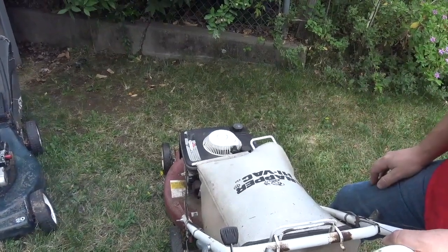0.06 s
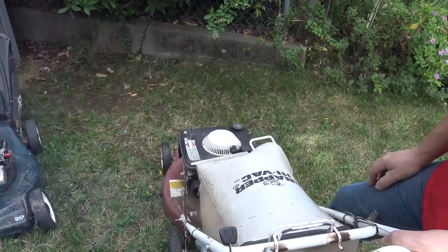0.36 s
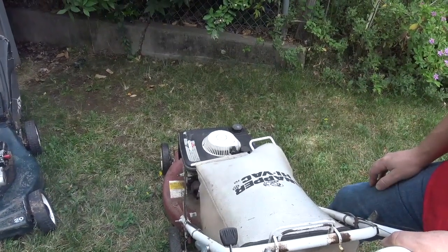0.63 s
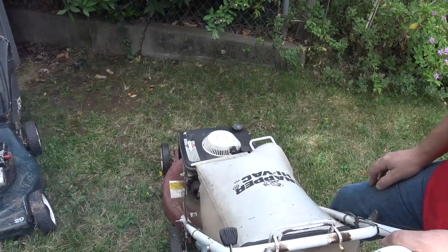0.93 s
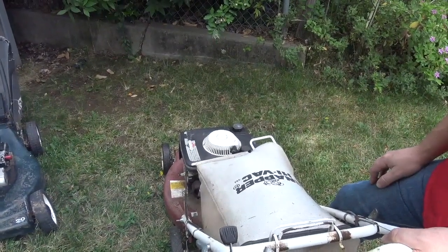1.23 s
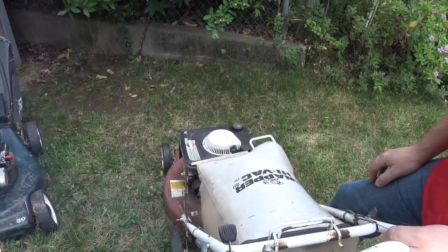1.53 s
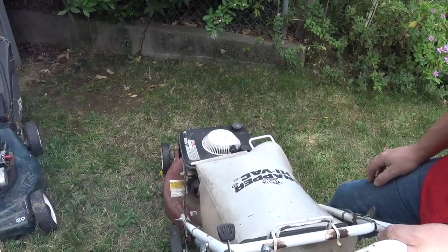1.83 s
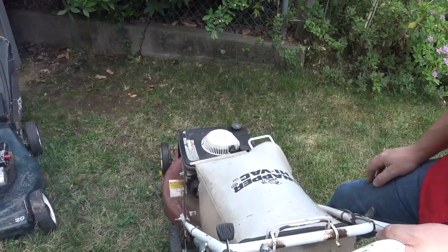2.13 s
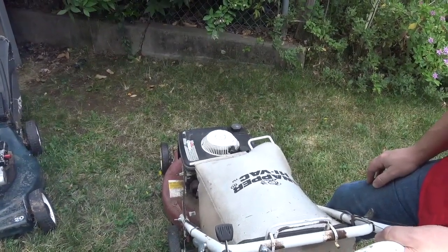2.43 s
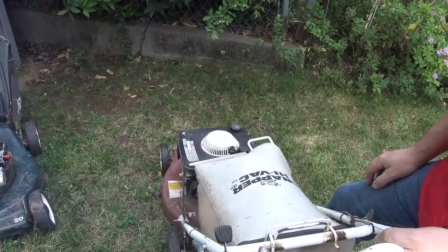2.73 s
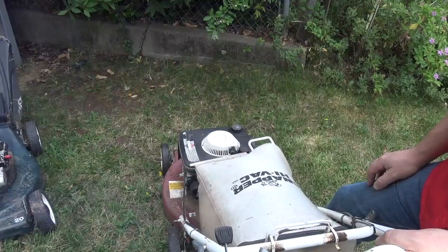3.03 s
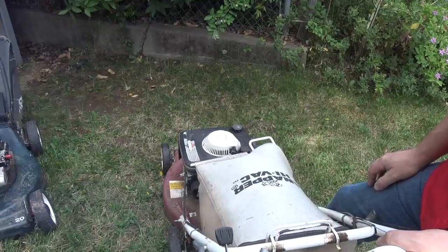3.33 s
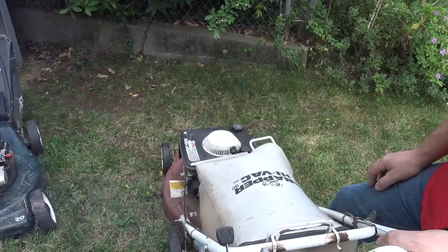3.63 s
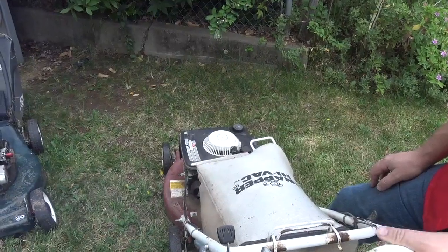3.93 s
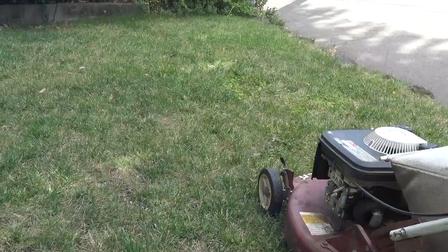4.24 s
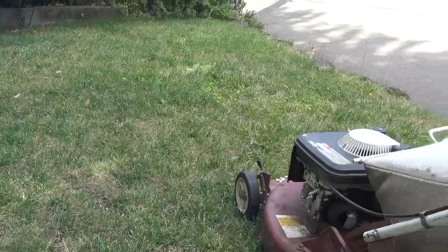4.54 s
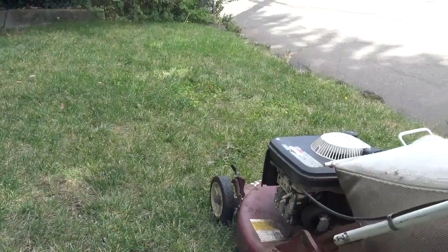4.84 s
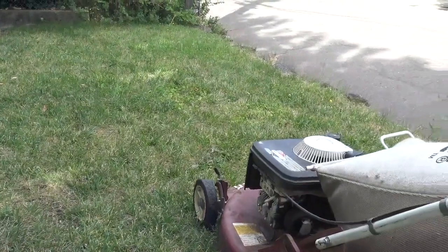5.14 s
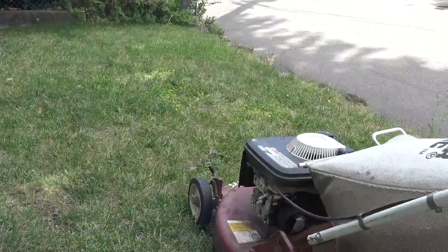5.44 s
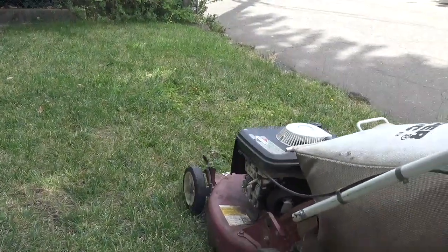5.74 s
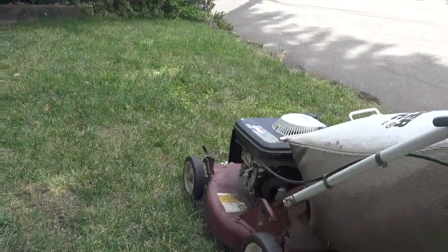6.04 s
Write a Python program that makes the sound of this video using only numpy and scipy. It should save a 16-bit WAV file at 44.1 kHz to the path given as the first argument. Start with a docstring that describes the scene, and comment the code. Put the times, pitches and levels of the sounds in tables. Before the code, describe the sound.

From the very start, a petrol push lawn mower runs at a steady speed outdoors, heard close from the handle. The spinning blade makes a deep, even hum over a low rush of churned air, while the single-cylinder engine adds a rapid clatter of exhaust barks and valve ticks, with a faint fan whine. A loose metal guard gives tiny, faint buzzes at about 0.2 and 0.5 seconds, around 1.4 to 1.6 seconds, and again at 3.5 seconds. At about 4 seconds the sound drops out for a split second. It returns at once from beside the mower, slightly louder and a touch higher in pitch, with a harsher exhaust rattle and a stronger low hum. From about 4.5 seconds the hum swells and shifts in tone as the mower rolls, then turns near 5.4 seconds. The engine keeps running until the end, at about 6 seconds.

```python
"""A push mower's single-cylinder four-stroke spins a two-ended blade at governed speed on a lawn.
The blade ends pass four times an engine cycle, so the deck hums in a harmonic series. Once a cycle
the exhaust barks and the valves clack; turbulent air rushes through deck and bag, the flywheel fan
whines and a loose guard buzzes. The mower is heard standing, from the handle, then, after a short
break, from the side while it rolls and turns."""
import sys
import numpy as np
from scipy import signal
from scipy.fft import rfft, irfft
from scipy.io import wavfile
from scipy.ndimage import uniform_filter1d

SR = 44100
rng = np.random.default_rng(int(sys.argv[2]) if len(sys.argv) > 2 else 0)


def file_out(sig):
    """Save sig as 16-bit WAV at sys.argv[1]."""
    # one column per channel
    cols = np.atleast_2d(sig).T
    # limit, then scale
    lim = np.clip(cols, -1, 1)
    pcm = np.round(lim * 32767).astype(np.int16)
    wavfile.write(sys.argv[1], SR, pcm)


N = 272097
T = np.arange(N) / SR
HZ = np.maximum(np.arange(N // 2 + 1) * SR / N, 1)

# harmonics of the blade-pass rate: multiple, level_db
HUM_HANDLE = [(1, -25.5), (2, -16), (3, -11.5), (4, -20), (5, -37)]
HUM_SIDE = [(1, -16), (2, -20), (3, -16), (4, -19), (5, -26)]
# hum tones that swell or sink while rolling: multiple, start_s, attack_s, hold_s, release_s, gain_db
HUM_SWELLS = [(1, 4.57, 1.07, .15, .15, -4), (2, 4.55, 0.36, .53, 0.12, 6.5), (2, 5.66, .08, 0.056, .08, 4)]
# harmonics of the firing rate: multiple, level_db
EXHAUST_TONES_HANDLE = [(1, -48), (2, -38), (3, -38), (5, -31), (6, -33.5), (7, -32.5), (9, -32),
                        (10, -24.5), (11, -29), (13, -39), (14, -31), (15, -52), (17, -35), (18, -29)]
EXHAUST_TONES_SIDE = [(1, -55), (2, -40), (3, -35), (5, -26.5), (6, -21.5), (7, -29), (9, -30), (10, -31),
                      (11, -29.5), (13, -32), (14, -65), (15, -36), (17, -40), (18, -41)]
# blows within one engine cycle: start_cycles, decay_cycles, relative_bark_db, relative_tick_db
CYCLE_BLOWS = [(.98, 0.069, 8.5, 1), (0.059, 0.077, 2.5, 1), (.155, 0.091, -1, 6), (.33, 0.076, -8, 0),
               (.52, 0.056, -1, 4), (.82, 0.065, -13, -10)]
# spectral envelope of the clatter: frequency_hz, relative_density_db
CLATTER_SPECTRUM_HANDLE = [(350, -36), (560, -4), (750, -2.5), (1000, -3), (1300, 1), (1650, -4),
                           (1950, -7), (2600, -7), (3400, -10), (4400, -10.5), (5700, -16), (7600, -16.5),
                           (8800, -18.5), (11000, -23)]
CLATTER_SPECTRUM_SIDE = [(440, -17), (570, -1), (700, 2.5), (950, -2), (1250, -1), (1750, -3.5),
                         (2400, -7.5), (3150, -11), (3600, -12.5), (6400, -16.5), (7100, -11.5),
                         (8200, -18), (10000, -21), (11000, -23.5)]
# resonances of shroud and muffler shell: centre_hz, width_hz, lift_db
SHELL_MODES = [(1210, 110, 1.5), (2200, 64, 3.5), (2412, 140, 5), (2667, 90, 4.5), (2943, 160, 7),
               (4090, 45, 6.5), (4340, 75, 4.5), (5190, 100, 2.5), (6170, 54, 6.5), (7630, 120, 2.5),
               (8200, 94, 4.5), (9530, 150, 6.5), (10380, 480, 7)]
# spectral envelope of the air churned under the deck: frequency_hz, relative_density_db
AIR_SPECTRUM_HANDLE = [(20, -24), (70, -24), (120, -9.5), (200, -2.5), (340, 0.5), (480, -2.5),
                       (600, -12.5), (900, -46), (2000, -60)]
AIR_SPECTRUM_SIDE = [(20, -21), (70, -10), (120, -11.5), (200, 1.5), (330, -4), (420, -9), (540, -8.5),
                     (900, -24), (2000, -62)]
# buzzes of the loose guard: peak_s, level_db
GUARD_BUZZES = [(.236, -28), (.513, -28), (1.359, -23.5), (1.568, -35), (1.638, -26), (3.486, -23)]
# level difference between the ears: frequency_hz, left_minus_right_db
EAR_BALANCE = [(60, 2), (115, -5), (190, -1.3), (340, -2), (610, -2.5), (1080, -1.1), (1930, 1),
               (3450, -0.5), (11000, 0)]
# spectral envelope of the scattering: frequency_hz, relative_gain_db
SCATTER_SPECTRUM = [(60, -1), (190, -8.5), (400, -8), (700, -13), (1100, -13), (2000, -15.5), (4000, -25),
                    (6500, -40), (10000, -15)]

PASSES_PER_CYCLE = 4  # two blade ends, two crank turns
TURN_MIDDLE_S, TURN_LENGTH_S = 5.43, .25


def undb(db):
    """Amplitude grows tenfold every 20 dB."""
    return 10 ** (np.asarray(db) / 20)


def level(x, db):
    """Normalisation sets the rms level."""
    return x * undb(db) / np.sqrt(np.mean(x ** 2))


def spectrum(points):
    """Interpolation on a log-frequency axis joins points into a dB curve."""
    hz, db = np.transpose(points)
    return np.interp(np.log(HZ), np.log(hz), db)


def colour(x, db):
    """Zero-phase filtering applies a dB gain at each frequency."""
    return irfft(rfft(x) * undb(db), N)


def walk(per_s):
    """Smoothing random steps twice gives a slow fluctuation with a spread near 1."""
    hold = int(SR / per_s)
    steps = rng.standard_normal(4096)[np.arange(N) // hold % 4096]
    return 1.374 * uniform_filter1d(uniform_filter1d(steps, hold), hold)


def per_cycle(cycle):
    """Sample and hold: one random value for each engine cycle."""
    return rng.standard_normal(512)[np.floor(cycle).astype(int) % 512]


def periodic_noise(cycle, size=1536):
    """Equal harmonics in random phase make a dense rattle that repeats every cycle."""
    period = irfft(np.exp(2j * np.pi * rng.random(size // 2 + 1)), size * 8)
    return level(np.interp(cycle % 1, np.arange(size * 8) / (size * 8), period), 0)


def cavity_phase(hz, centre_hz, width_hz):
    """A tone's phase lag rises as its frequency crosses a cavity resonance."""
    return 2 * np.arctan(2 * (hz - centre_hz) / width_hz)


def at_ears(tones, rush, scatter_db, size=2048):
    """Scattering from lawn, handle and bag makes the rush differ between the ears."""
    echoes = irfft(np.exp(2j * np.pi * rng.random(size // 2 + 1)))
    scattered = colour(signal.fftconvolve(rush, echoes)[:N], spectrum(SCATTER_SPECTRUM) + scatter_db)
    tilt_db = spectrum(EAR_BALANCE) / 2
    return np.array([colour(tones + rush, sign * tilt_db) + sign * scattered for sign in (1, -1)])


def turned():
    """A linear ramp, 0 to 1, tells how far the mower has turned."""
    return np.clip((T - TURN_MIDDLE_S) / TURN_LENGTH_S + .5, 0, 1)


def reflection_notch(rush, centre_hz=444, width_hz=85, depth_db=-3):
    """Interference with a reflection thins the low middle of the rush until the mower turns."""
    thin = colour(rush, depth_db * np.exp(-((HZ - centre_hz) / width_hz) ** 2))
    return thin + turned() * (rush - thin)


def rolling_gain_db(multiple, hz, before_hz=350, after_hz=500, width_hz=77, depth_db=-12):
    """Direct and reflected hum cancel in a notch that rises in the turn; single tones swell or sink."""
    notch_hz = before_hz + turned() * (after_hz - before_hz)
    gain_db = depth_db * np.exp(-((hz - notch_hz) / width_hz) ** 2)
    for tone, start, attack, hold, release, db in HUM_SWELLS:
        if tone == multiple:
            gain_db += np.interp(T, start + np.cumsum([0, attack, hold, release]), [0, db, db, 0])
    return gain_db


def guard_buzz(centre_hz, width_hz, half_length_s):
    """The loose guard's thin sheet metal chatters in brief bursts around one broad resonance."""
    bursts = sum(undb(db) * np.exp(-((T - peak_s) / half_length_s) ** 2) for peak_s, db in GUARD_BUZZES)
    resonance_db = -20 * np.log10(1 + (2 * (HZ - centre_hz) / width_hz) ** 2)
    return bursts * level(colour(rng.standard_normal(N), resonance_db), 0)


def fan_whine(cycle, db, vanes=16):
    """The flywheel whines at its vane-pass frequency; each vane passes twice a cycle."""
    vane_phase = 2 * np.pi * 2 * vanes * cycle
    return np.sqrt(2) * undb(db + 2 * walk(12)) * np.sin(vane_phase)


def deck_air(cycle, points, db, chop):
    """Turbulence under the deck is amplitude-modulated by the passing blade."""
    gusts = rng.standard_normal(N) * (1 + chop * np.cos(2 * np.pi * PASSES_PER_CYCLE * cycle))
    return level(colour(gusts, spectrum(points)), db)


def clatter(cycle, points, db, bark_gain_db, tick_gain_db, chop, rise_cycles=.0095):
    """Deck rattle, exhaust bark and valve ticks stand out of a steady rasp and excite the shell modes."""
    rattle_power = (1 + chop * np.cos(2 * np.pi * PASSES_PER_CYCLE * (cycle - .1))) ** 2
    bark_power, tick_power = 1, 1
    for start, decay, bark_db, tick_db in CYCLE_BLOWS:
        age = (cycle - start) % 1
        blow = (1 - np.exp(-age / rise_cycles)) * np.exp(-age / decay)
        blow *= undb(1.1 * per_cycle(cycle - start))
        bark_power += (blow * undb(bark_gain_db + bark_db)) ** 2
        tick_power += (blow * undb(tick_gain_db + tick_db)) ** 2
    # the deck carries the low middle, gas the high middle, metal contact the treble
    low = 1 / (1 + (HZ / 1550) ** 4)
    treble = 1 / (1 + (3600 / HZ) ** 10)
    middle = (1 - low) * (1 - treble)
    layers = (rattle_power, low, .35), (bark_power, middle, .55), (tick_power, treble, .22)
    mix = 0
    for power, band, share in layers:
        # a share of the power repeats with the machinery, the rest is fresh turbulence
        grit = np.sqrt(share) * periodic_noise(cycle) + np.sqrt(1 - share) * rng.standard_normal(N)
        pulsing = level(grit * np.sqrt(power), 0) * undb(.58 * walk(25))
        mix += rfft(pulsing) * np.sqrt(band)
    shell_db = sum(lift / (1 + (2 * (HZ - hz) / width) ** 2) for hz, width, lift in SHELL_MODES)
    return level(colour(irfft(mix, N), spectrum(points) + shell_db), db)


def exhaust_note(cycle, tones, muffler_hz, width_hz, lag_cycles, uneven_db):
    """One puff a cycle, uneven in strength, drives the muffler resonance at the firing harmonics."""
    note, firing_hz = 0, np.mean(np.diff(cycle)) * SR
    for multiple, db in tones:
        muffler_lag = cavity_phase(multiple * firing_hz, muffler_hz, width_hz)
        note += undb(db) * np.cos(2 * np.pi * multiple * (cycle - lag_cycles) - muffler_lag)
    return np.sqrt(2) * note * undb(uneven_db * walk(29))


def blade_hum(cycle, tones, deck_hz, width_hz, lag_cycles, flutter_db, rolling=False):
    """Periodic forcing: each blade end thumps the air past the chute, and the deck rings after it."""
    hum, firing_hz = 0, np.mean(np.diff(cycle)) * SR
    for multiple, db in tones:
        order = PASSES_PER_CYCLE * multiple
        hz = order * firing_hz
        if rolling:
            db = db + rolling_gain_db(multiple, hz)
        phase = 2 * np.pi * order * (cycle - lag_cycles) - cavity_phase(hz, deck_hz, width_hz)
        hum += undb(db + flutter_db * walk(14)) * np.cos(phase)
    return np.sqrt(2) * hum


def engine_cycles(rpm, zero_s, waver_rpm=5):
    """Phase, in engine cycles, is the integral of a speed that wavers with uneven firings."""
    wavering_rpm = rpm + waver_rpm * walk(14)
    count = np.cumsum(wavering_rpm) / 120 / SR  # 60 s a minute, two crank turns a cycle
    return count - np.interp(zero_s, T, count)


def mower_from_handle(mean_rpm=3442.3, hunt_rpm=6.5, hunt_period_s=2.3, crest_s=2.22):
    """Behind the bag the deck booms and the engine lies in acoustic shadow; the governor hunts slowly."""
    rpm = mean_rpm + hunt_rpm * np.cos(2 * np.pi * (T - crest_s) / hunt_period_s)
    cycle = engine_cycles(rpm, zero_s=.0227)
    hum = blade_hum(cycle, HUM_HANDLE, deck_hz=356.6, width_hz=74, lag_cycles=.1284, flutter_db=-.07)
    note = exhaust_note(cycle, EXHAUST_TONES_HANDLE, muffler_hz=298.5, width_hz=59,
                        lag_cycles=.395, uneven_db=2)
    rush = clatter(cycle, CLATTER_SPECTRUM_HANDLE, db=-19.5, bark_gain_db=5, tick_gain_db=4.5, chop=.35)
    rush += deck_air(cycle, AIR_SPECTRUM_HANDLE, db=-17, chop=.24)
    rush += guard_buzz(centre_hz=3760, width_hz=1500, half_length_s=.015)
    return at_ears(hum + note + fan_whine(cycle, db=-36), rush, scatter_db=-1.5)


def mower_from_side(start_rpm=3512, rolling_from_s=4.06, sag_rpm_per_s=11.5):
    """Beside the deck the muffler radiates along a direct path; the load of the grass slows the crank."""
    rpm = start_rpm - sag_rpm_per_s * np.maximum(T - rolling_from_s, 0)
    cycle = engine_cycles(rpm, zero_s=4.085)
    hum = blade_hum(cycle, HUM_SIDE, deck_hz=198, width_hz=57,
                    lag_cycles=.193, flutter_db=.8, rolling=True)
    note = exhaust_note(cycle, EXHAUST_TONES_SIDE, muffler_hz=317, width_hz=46,
                        lag_cycles=.238, uneven_db=1.5)
    rush = clatter(cycle, CLATTER_SPECTRUM_SIDE, db=-15.5, bark_gain_db=7.5, tick_gain_db=5, chop=.15)
    rush += deck_air(cycle, AIR_SPECTRUM_SIDE, db=-17.5, chop=.56)
    return at_ears(hum + note + fan_whine(cycle, db=-34), reflection_notch(rush), scatter_db=.5)


def scene():
    """Directivity: one mower sounds different from two places, with a short silence between them."""
    fade_out = np.interp(T, [4.008, 4.026], [1, 0])
    fade_in = np.interp(T, [4.056, 4.067], [0, 1])
    return fade_out * mower_from_handle() + fade_in * mower_from_side()


def record(dry):
    """Soft saturation rounds the highest peaks, and a steep low-pass cuts the top of the treble."""
    ceiling, cutoff_hz = .96, 11050
    rounded = dry / (1 + np.abs(dry / ceiling) ** 8) ** (1 / 8)
    return signal.sosfilt(signal.ellip(12, .1, 80, cutoff_hz, fs=SR, output="sos"), rounded)


dry = scene()
out = record(dry)
file_out(out)
```